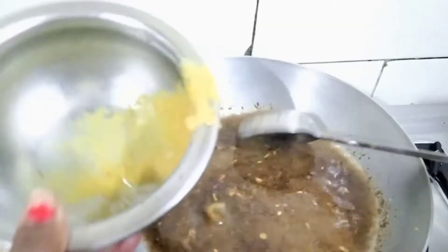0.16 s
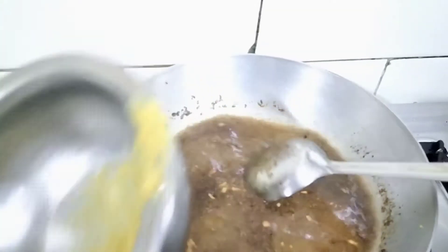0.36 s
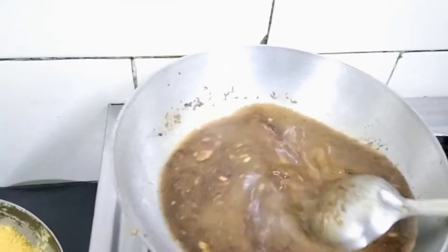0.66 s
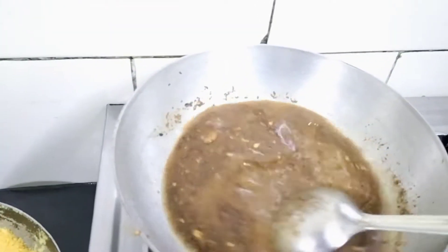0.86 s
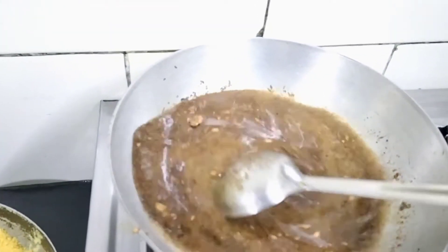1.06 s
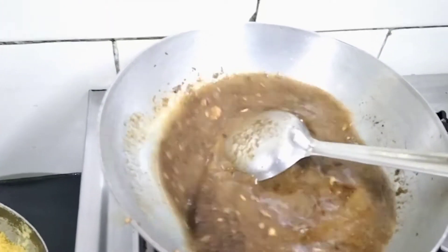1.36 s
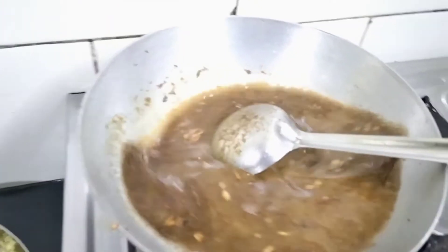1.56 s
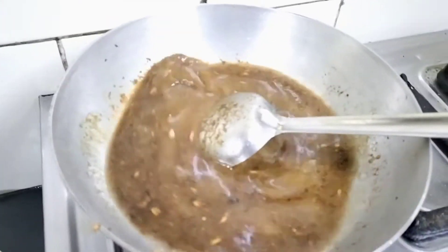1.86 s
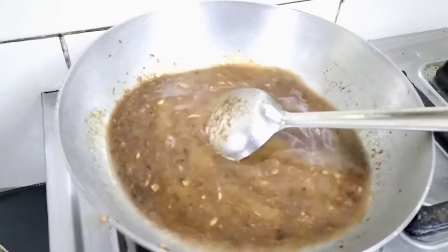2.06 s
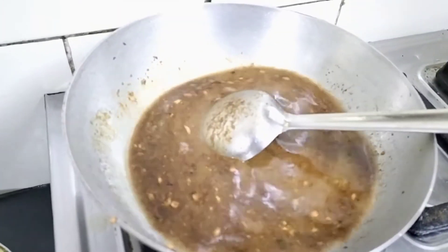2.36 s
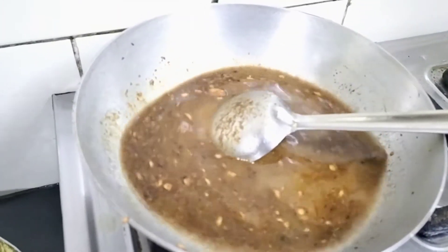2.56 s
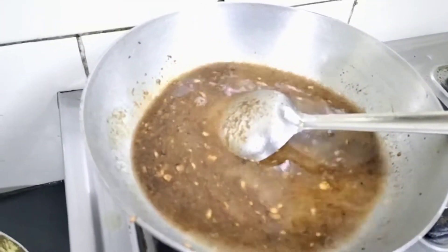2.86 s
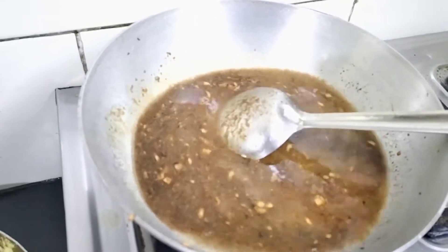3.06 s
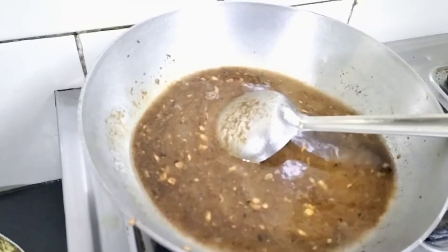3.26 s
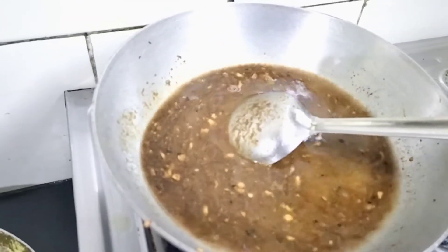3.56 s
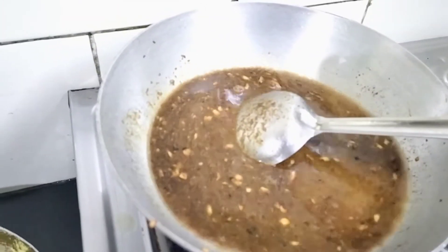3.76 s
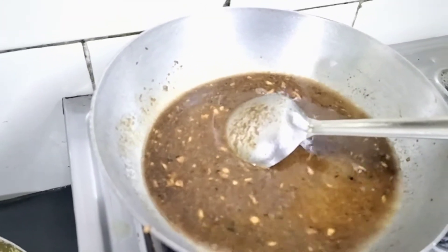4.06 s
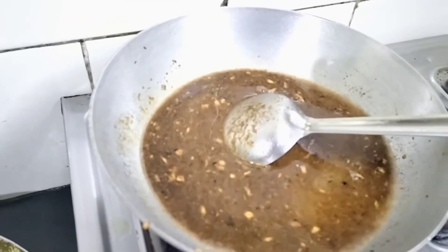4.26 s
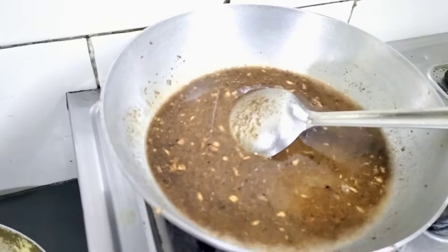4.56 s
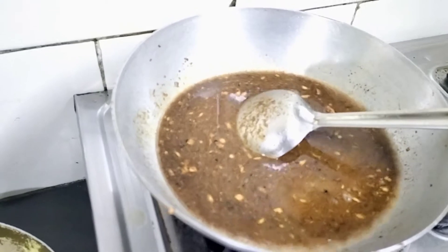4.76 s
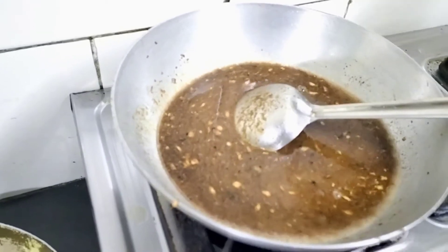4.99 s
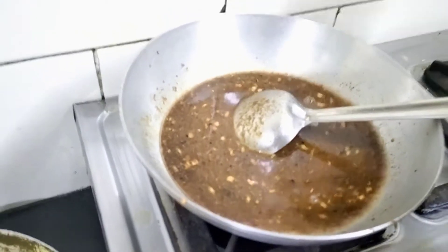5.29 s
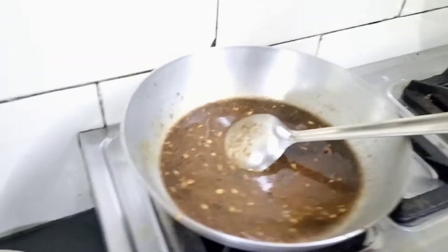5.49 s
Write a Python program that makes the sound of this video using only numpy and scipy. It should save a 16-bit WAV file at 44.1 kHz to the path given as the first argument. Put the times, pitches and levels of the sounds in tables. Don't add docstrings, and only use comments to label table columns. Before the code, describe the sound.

A small close microphone in a tiled kitchen catches liquid boiling fiercely in a hot steel pan. The dense, bright sizzle bursts up at once, stays loud for over two seconds, then weakens in uneven surges. Low sloshing continues underneath. In the second half a steel bowl knocks and rings briefly, a spoon taps, and a lid and plate clatter.

```python
import sys
import numpy as np
from scipy import signal
from scipy.fft import rfft, irfft
from scipy.io import wavfile
from scipy.ndimage import uniform_filter1d

SR = 44100
rng = np.random.default_rng(int(sys.argv[2]) if len(sys.argv) > 2 else 0)


def to_linear_factor(level_db):
    exponent = np.asarray(level_db, float) / 20
    return 10 ** exponent


def pcm_store(signal):
    levels = np.round(np.clip(np.atleast_2d(signal), -1, 1) * 32767)
    wavfile.write(sys.argv[1], SR, levels.astype(np.int16).T)


N = 248326


def sizzle():
    shaking = rng.standard_normal(N)
    upper = fizz() + pan_wall(shaking) + rim(shaking) + simmer() + spray() + hiss()
    swarms = uniform_filter1d(rng.exponential(1, N) - 1, size=1800)
    swarms = evened(uniform_filter1d(swarms, size=900))
    return upper * to_linear_factor(0.3 * swarms) + hum(shaking)


# pitch_hz, level_db (per Hz)
FIZZ = [(1150, -28), (1950, -13), (2190, -8), (2700, 1.5), (3040, -2.5), (3860, 0), (4500, -13),
        (5850, -16), (9900, -120)]


def fizz():
    return bubbles(FIZZ, per_s=6000, size_db=3.5, steam=2.2, patchy_db=0.26, streaky_db=2.0) * answer()


# pitch_hz, level_db (per Hz)
HISS = [(2590, -26), (4400, -7), (5360, -3.5), (5920, 0.5), (6600, -1.5), (7110, -0.5), (8350, -7),
        (9500, -25), (12400, -80), (20900, -120)]


def hiss():
    film = to_linear_factor(2.5 / (1 + np.exp((seconds() - 1.0) / 0.033)))
    level = answer(over_db=-4, decline=1.0636, lapped=1.36, stirred_db=-.5, splash_db=6.5)
    return bubbles(HISS, per_s=6000, size_db=3.5, steam=1.8, patchy_db=0.63, streaky_db=1.45) * level * film


# pitch_hz, width_hz, level_db
PAN_MODES = [(834, 12, -25.5), (1274, 18, -33), (1340, 11, -44), (1594, 40, -24.5), (2160, 35, -35),
             (2226, 35, -16.5), (2439, 17, -15), (2625, 49, -13.5), (2886, 15, -27), (3670, 54, -24),
             (5060, 8.7, -23.5), (5820, 30, -17.5)]


def pan_wall(shaking):
    return answer() * sum(to_linear_factor(db) * evened(resonate(shaking, hz, width_hz)) for hz, width_hz, db in PAN_MODES)


def rim(shaking):
    level = answer(over_db=-16, decline=0.66, lapped=1.83, stirred_db=-5.5, splash_db=11)
    return evened(resonate_twice(shaking, 3794, 480)) * level


# pitch_hz, level_db (per Hz)
SIMMER = [(600, -40), (720, -9), (800, -5), (850, -22), (1060, -22), (1120, -5), (1460, 0), (1960, -7),
          (2150, -30)]


def simmer():
    level = answer(over_db=-21, decline=0.93, lapped=0.6, stirred_db=12, splash_db=1.5)
    return bubbles(SIMMER, per_s=1500, size_db=1.0, steam=1.4, patchy_db=0.3, streaky_db=3.0) * level


# pitch_hz, level_db (per Hz)
SPRAY = [(8600, -30), (9300, -12), (9600, -13), (10300, -7.5), (11500, -4), (12000, 0), (12500, -4.5),
         (13200, -6), (15000, -5), (15900, -7)]
# start_s, level_db
SETTLES = [
    (2.78, -6),
    (5.28, -6),
]


def spray():
    calm = to_linear_factor(sum(db / (1 + np.exp((s - seconds()) / .05)) for s, db in SETTLES))
    level = answer(over_db=-22, decline=0.75, lapped=0.9, stirred_db=5, splash_db=10)
    return bubbles(SPRAY, per_s=3700, size_db=4.0, steam=1.6, patchy_db=-2.0, streaky_db=1.5) * level * calm


def hum(shaking):
    damped_s, damped_for_s, damped_db = 2.67, 0.25, -23
    damped = to_linear_factor(damped_db * np.exp(-((seconds() - damped_s) / damped_for_s) ** 4))
    level = answer(over_db=-17.5, decline=1.03, lapped=0.72, stirred_db=0, splash_db=-0.5)
    return evened(resonate_twice(shaking, 956, 205)) * level * damped


def bubbles(spectrum, per_s, size_db, steam, patchy_db, streaky_db):
    bursts = (rng.random(N) < per_s / SR) * rng.standard_normal(N)
    bursts *= to_linear_factor(size_db * np.minimum(rng.exponential(1, N), 3))
    source = evened(bursts) + steam * rng.standard_normal(N)
    hz, t, z = signal.stft(source, SR, nperseg=2048, noverlap=1536)
    broad = patches(z.shape, bins=24, frames=6)
    narrow = patches(z.shape, bins=3, frames=14)
    f, db = np.transpose(spectrum)
    colour_db = np.interp(np.log(hz + 1), np.log(f), db, left=-120, right=-120)[:, None]
    z = z * to_linear_factor(colour_db + patchy_db * broad + streaky_db * narrow)
    return evened(signal.istft(z, SR, nperseg=2048, noverlap=1536)[1][:N])


def patches(shape, bins, frames):
    field = uniform_filter1d(rng.standard_normal(shape), bins, axis=0)
    return evened(uniform_filter1d(field, frames, axis=1))


# start_s, level_db
BOIL = [(0, -30), (.13, -22.5), (.34, -17.5), (.62, -18), (.75, -19.5), (.85, -19), (1.5, -20), (2.13, -20),
        (2.36, -22.5), (2.54, -22), (2.75, -28), (3.03, -30), (3.3, -29.5), (3.6, -35.5), (4.0, -41.5),
        (4.88, -46), (5.63, -47.5)]
# start_s, share (0-1)
STIR = [(0, 0), (.14, 0.2), (.55, 0.62), (.8, 0.7), (1.15, 0.96), (1.6, 0.77), (2.4, 0.52), (3.1, 0.76),
        (5.63, 0.71)]


def answer(over_db=0, decline=1, lapped=1, stirred_db=0, splash_db=0):
    full_boil_db, splash_s = -16.5, 0.13
    boil_db = full_boil_db + decline * (along(BOIL) - full_boil_db) + lapped * laps()
    splash = np.exp(-seconds() / splash_s)
    return to_linear_factor(over_db + boil_db + stirred_db * along(STIR) + splash_db * splash)


# peak_s, level_db, swell_s, ebb_s
LAPS = [
    (2.89, 2.5, 0.13, 0.093),
    (3.36, 1, 0.068, 0.032),
    (3.771, 10, 0.099, 0.16),
    (4.21, 3, 0.17, 0.046),
    (4.6, 6.5, 0.33, 0.23),
    (5.0, 4.5, 0.097, 0.074),
]


def laps():
    t = seconds()
    total_db = np.zeros(N)
    for s, db, swell, ebb in LAPS:
        distance = np.where(t < s, ((s - t) / swell) ** 2, (abs(t - s) / ebb) ** 4)
        total_db += db * np.exp(-distance)
    return total_db


# pitch_hz, level_db (first moments), t60_s
BOWL = [(300, -21, .15), (447, -24, .4), (780, -8, .05), (980, 0, .11), (1174, -6, .09), (1620, -15, .45),
        (2400, -1, .1), (2700, -9, .06), (3200, -6, .06)]
# start_s, level_db, rise_s, hold_s, t60_s
BOWL_HITS = [
    (3.041, -29, 0.0018, 0.012, 0.15),
    (3.047, -25.5, 0.0056, 0.023, 0.12),
]


def bowl():
    return rattle(BOWL, BOWL_HITS, clatter_db=-2, tilt_db=-4)


# pitch_hz, level_db (first moments), t60_s
SPOON = [(270, -16, .14), (1600, -11, .12), (1884, -4, .09), (2175, -12, .09), (2760, -8, .06),
         (3553, -3, .05), (4100, -2, .04), (4662, -7, .05), (7400, -11, .05), (9410, -16, .06)]
# start_s, level_db, rise_s, hold_s, t60_s
SPOON_HITS = [
    (4.3354, -34, 0.00025, 0.0078, 0.086),
    (4.345, -35.5, 0.0039, 0.017, 0.098),
]


def spoon():
    return rattle(SPOON, SPOON_HITS, clatter_db=1, tilt_db=1.6)


# pitch_hz, level_db (first moments), t60_s
LID = [(250, -13, .1), (340, -8, .1), (441, -11, .12), (522, -7, .18), (650, -12, .08), (964, -12, .08),
       (1803, -12, .06), (2460, -7, .05), (3560, -3, .05), (3962, -6, .07), (4770, -13, .04)]
# start_s, level_db, rise_s, hold_s, t60_s
LID_HITS = [
    (5.092, -35.5, .004, 0.034, 0.27),
    (5.121, -39.5, 0.006, 0.011, 0.061),
]


def lid():
    return rattle(LID, LID_HITS, clatter_db=2, tilt_db=-1.5)


# pitch_hz, level_db (first moments), t60_s
PLATE = [(205, -13, .14), (350, -14, .14), (598, -12, .12), (791, -8, .08), (1190, -13, .08),
         (1760, -5, .07), (2196, -6, .07), (2622, -2, .12), (3994, -10, .05), (4800, -9, .04),
         (7111, -11, .04)]
# start_s, level_db, rise_s, hold_s, t60_s
PLATE_HITS = [
    (5.201, -33, 0.0025, 0.03, 0.09),
    (5.234, -49, 0.0049, 0.019, 0.31),
]


def plate():
    return rattle(PLATE, PLATE_HITS, clatter_db=1, tilt_db=.6)


def rattle(modes, hits, clatter_db, tilt_db):
    track = np.zeros(N)
    for s, *contact in hits:
        add(track, s, knock(modes, clatter_db, tilt_db, *contact))
    return track


# pitch_hz, level_db
COUNTER = [(60, -33), (200, -9), (500, -14.5), (1000, -5.5), (1900, -3.5), (2700, -1.5), (3900, 1.5),
           (4500, -11), (6500, -4), (8400, -14), (9600, -42), (15700, -7)]


def knock(modes, clatter_db, tilt_db, db, rise, hold, t60):
    contact = blow(rise, hold, t60)
    rung = sum(to_linear_factor(level_db) * levelled(resonate(contact, hz, 2.2 / decay)) for hz, level_db, decay in modes)
    hz = np.fft.rfftfreq(SR, 1 / SR) + 1
    f, colour_db = np.transpose(COUNTER)
    colour_db = np.interp(np.log(hz), np.log(f), colour_db)
    colour_db += tilt_db * np.log2(np.maximum(hz, 700) / 2000)
    clatter = levelled(irfft(rfft(contact) * to_linear_factor(colour_db), SR))
    return to_linear_factor(db) * (rung + to_linear_factor(clatter_db) * clatter)


# start_s, level_db, pitch_hz, t60_s
RINGS = [
    (3.11, -37, 450, 0.68),
    (3.055, -32, 1620, .55),
    (3.054, -39, 2374, 0.36),
    (4.34, -43, 1884, .2),
    (4.345, -51, 1600, .25),
    (5.21, -44, 2622, 0.22),
    (5.212, -45, 1760, .15),
]


def rings():
    track, t = np.zeros(N), np.arange(SR) / SR
    for s, db, hz, t60 in RINGS:
        swell = 1 - np.exp(-t / 0.013)
        tone = np.sqrt(2) * np.sin(2 * np.pi * hz * t)
        add(track, s, to_linear_factor(db - 60 * t / t60) * swell * tone)
    return track


# start_s, level_db, pitch_hz, width_hz, t60_s
BUMPS = [(1.02, -48.5, 187, 120, 0.24), (3.235, -42, 318, 258, 0.85), (3.338, -34, 1140, 1000, 0.013),
         (3.346, -29, 1280, 2000, 0.19), (3.4, -46, 324, 250, 0.4), (4.03, -60, 282, 150, 1),
         (3.76, -55.5, 332, 200, .4), (4.17, -51.5, 300, 200, 0.35), (4.18, -44, 870, 402, 0.13),
         (4.18, -45.5, 1650, 200, 0.13), (4.268, -47.5, 950, 152, 0.38), (4.4, -53.5, 293, 120, 0.17),
         (5.232, -42, 2580, 120, .13), (5.255, -41.5, 390, 450, 0.26), (3.1, -54, 138, 80, 0.34),
         (3.359, -56, 113, 70, 0.28), (3.402, -42, 1300, 1500, 0.01), (4.33, -71, 91, 60, .25),
         (5.325, -50, 3600, 500, 0.06)]
# start_s, level_db
GLINTS = [
    (3.053, -53),
    (4.335, -64),
    (5.203, -53),
]


def bumps():
    track = np.zeros(N)
    for s, db, hz, width_hz, t60 in BUMPS:
        rise = .013 * (1 - np.exp(-t60 / .2))
        add(track, s, bump(db, hz, width_hz, rise, t60))
    for s, db in GLINTS:
        add(track, s, bump(db, hz=14000, width_hz=6500, rise=.002, t60=.12))
    add(track, 4.87, bump(db=-69, hz=88, width_hz=60, rise=.15, t60=1.3))
    return track


def bump(db, hz, width_hz, rise, t60):
    return to_linear_factor(db) * levelled(resonate_twice(blow(rise, 0, t60), hz, width_hz))


def blow(rise, hold, t60):
    t = np.arange(SR) / SR
    decay = to_linear_factor(-60 * np.maximum(t - hold, 0) / t60)
    return rng.standard_normal(SR) * (1 - np.exp(-t / rise)) * decay


# pitch_hz, level_db (per Hz)
RUMBLE = [(82, -36), (140, -24), (195, -16.5), (295, -10), (428, -3), (607, -4.5), (720, -2), (940, -24),
          (1580, -120)]


def slosh():
    level = answer(over_db=-35.5, decline=0.7, lapped=-0.2, stirred_db=15.5, splash_db=-13)
    return bubbles(RUMBLE, per_s=440, size_db=5.5, steam=2.1, patchy_db=1.5, streaky_db=4.5) * level


# pitch_hz, level_db (per Hz)
BURNER = [(12, -60), (20, -31), (86, -13), (119, 1.5), (156, -21), (200, 1), (260, -9.5), (440, -120)]


def flame():
    drift_db = along([(0, -2), (.5, 6), (2.5, -3.5), (5.6, 1)])
    tone = bubbles(BURNER, per_s=100, size_db=-8.0, steam=2.5, patchy_db=2.5, streaky_db=2.5)
    return tone * to_linear_factor(-65.5 + drift_db)


def kitchen(x, t60):
    taps = np.zeros(SR // 2)
    at = np.arange(200, SR // 2 - 20, 20)
    signs = rng.choice([-1., 1.], len(at))
    taps[at + rng.integers(0, 20, len(at))] = signs * to_linear_factor(-60 * at / SR / t60)
    return signal.fftconvolve(x, taps / np.linalg.norm(taps))[:N]


def resonate(x, hz, width_hz):
    r = np.exp(-np.pi * width_hz / SR)
    return signal.lfilter([1 - r, 0, r - 1], [1, -2 * r * np.cos(2 * np.pi * hz / SR), r ** 2], x)


def resonate_twice(x, hz, width_hz):
    return resonate(resonate(x, hz, width_hz), hz, width_hz)


def evened(x):
    return x / np.sqrt(np.mean(x ** 2) + 1e-20)


def levelled(x):
    return x / x[:SR // 25].std()


def seconds():
    return np.arange(N) / SR


def along(rows):
    return np.interp(seconds(), *np.transpose(rows))


def add(mix, s, sound):
    part = mix[round(s * SR):][:len(sound)]
    part += sound[:len(part)]


def scene():
    knocks = bowl() + spoon() + lid() + plate() + rings()
    knocks = signal.sosfilt(signal.butter(4, [190, 9000], "band", fs=SR, output="sos"), knocks)
    knocks += bumps()
    mono = sizzle() + knocks + to_linear_factor(-11) * kitchen(knocks, t60=.28) + slosh() + flame()
    return np.array([mono, mono])


# start_s, low_hz, high_hz
FLIPPED = [(.345, 10500, 12000), (.345, 14300, 15000), (.368, 14300, 15000), (.39, 9800, 10500),
           (1.762, 10600, 11300), (1.762, 14300, 16000), (1.762, 12900, 13500), (1.785, 12700, 13500),
           (1.808, 9000, 9800), (1.808, 13500, 14300), (1.808, 15100, 16000)]


def spread_treble(mono):
    hz, t, z = signal.stft(mono, SR, nperseg=512, noverlap=448)
    z = z * (hz < 15740)[:, None]
    when, where = rng.random((24, 2)).T
    lows = 4300 * (12500 / 4300) ** where
    moves = [(s, f, f * 2 ** .4, .5) for s, f in zip(when ** 1.1 * N / SR, lows)]
    moves += [(*row, .97) for row in FLIPPED]
    share = np.zeros(z.shape)
    for s, low_hz, high_hz, part in moves:
        centre = (889 + 1024 * round((s * SR - 889) / 1024)) / SR
        moment = np.clip(2 - abs(t - centre) / .009, 0, 1)
        band = (hz > low_hz) & (hz < high_hz)
        share = np.maximum(share, part * np.outer(band, moment))
    mid = signal.istft(z * np.sqrt(1 - share), SR, nperseg=512, noverlap=448)[1][:N]
    side = signal.istft(1j * z * np.sqrt(share), SR, nperseg=512, noverlap=448)[1][:N]
    return np.array([mid + side, mid - side])


def low_pass(x):
    return signal.sosfilt(signal.butter(12, 16930, fs=SR, output="sos"), x)


def record(dry):
    thin = signal.sosfilt(signal.butter(2, 55, "high", fs=SR, output="sos"), dry.mean(0))
    limited = 1.3 * np.tanh(thin / 1.3)
    mix = spread_treble(limited)
    return low_pass(mix)


dry = scene()
out = record(dry)
pcm_store(out)
```